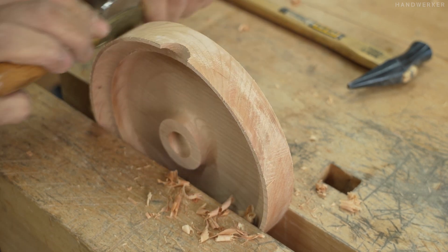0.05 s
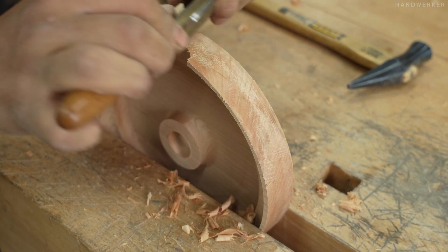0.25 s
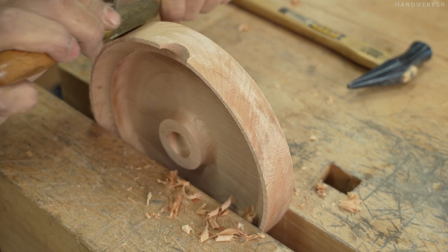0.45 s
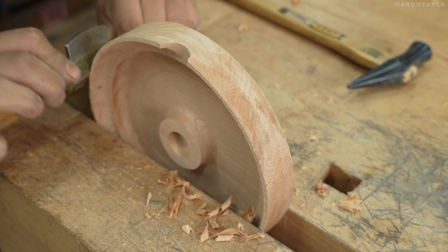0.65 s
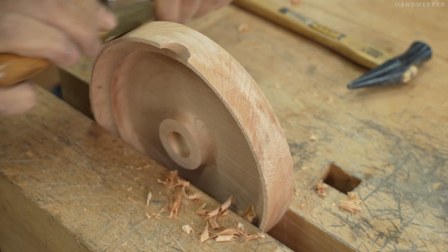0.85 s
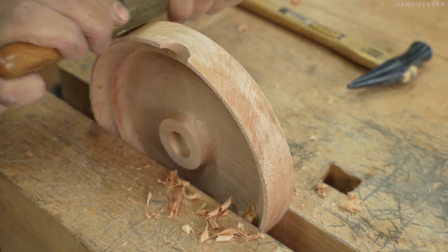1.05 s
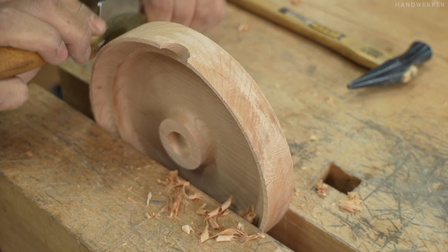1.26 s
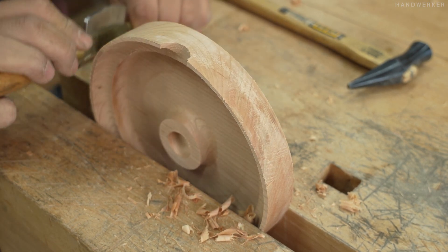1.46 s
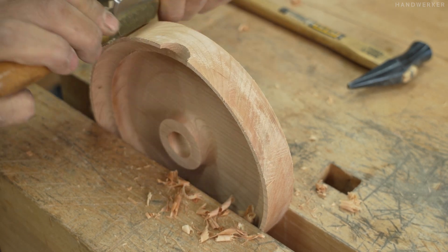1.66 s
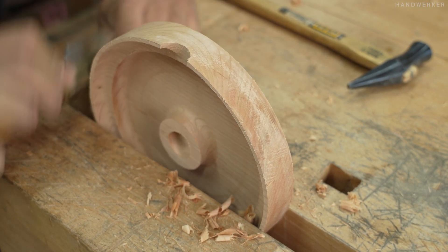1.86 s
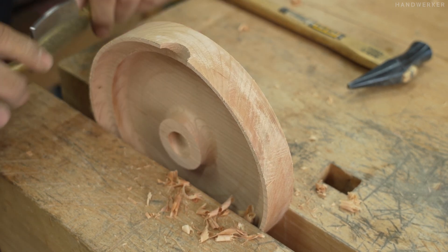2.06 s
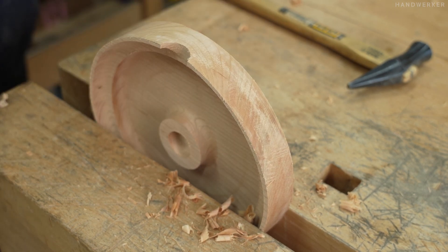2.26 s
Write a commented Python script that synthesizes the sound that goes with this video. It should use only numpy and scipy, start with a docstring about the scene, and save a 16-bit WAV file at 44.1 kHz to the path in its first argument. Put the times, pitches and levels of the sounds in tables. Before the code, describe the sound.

A steel blade shaves a wooden wheel's rim, close by in a small workshop with a faint hum. A hollow rub and brief squeak at 0.3 seconds lead into a rasping cut until 0.6. The blade taps and slides back around 0.9. Two quick cuts follow from 1.1 to 1.35, ending in a squeak. After more rubbing, a last cut comes at 1.8 with light knocks.

```python
"""In a small workshop, a two-handled steel blade shaves the rim of a wooden wheel clamped in a bench.
Four cutting strokes tear the wood fibres, which makes the steel, the shaving and the wheel ring.
Between cuts the blade is set down and slid back with a duller, hollow rub. Now and then it sticks
and slips in a short squeak. The bench rumbles under the push, and the room hums faintly."""
import sys
import numpy as np
from scipy import signal
from scipy.fft import rfft, irfft, next_fast_len
from scipy.io import wavfile
from scipy.ndimage import map_coordinates

SR = 44100
rng = np.random.default_rng(int(sys.argv[2]) if len(sys.argv) > 2 else 0)


def waveform_to_disk(signal):
    """Save audio, clipped to [-1, 1], as 16-bit WAV at the path in sys.argv[1]."""
    frames = np.transpose(np.atleast_2d(signal))
    scaled = np.clip(frames, -1, 1) * 32767
    samples = np.round(scaled).astype(np.int16)
    wavfile.write(sys.argv[1], SR, samples)


N = 105840

# The force on the blade, one list per cut. Each row: time in seconds, level in dB.
CUT_FORCES = [
    [(.335, -52.5), (.395, -32.5), (.44, -27.5), (.47, -28.5), (.51, -34.5), (.555, -31.5), (.608, -23.5),
     (.617, -40), (.69, -45), (.76, -63)],
    [(1.035, -61), (1.09, -42), (1.125, -31.5), (1.185, -27), (1.222, -33), (1.24, -49.5), (1.28, -51.5)],
    [(1.274, -48), (1.284, -36), (1.315, -27.5), (1.346, -31), (1.356, -47.5), (1.43, -44), (1.46, -60)],
    [(1.715, -58.5), (1.765, -33), (1.825, -24.5), (1.858, -28), (1.866, -43), (1.935, -45.5), (2.03, -64)],
]
# The mix of each cut. Each row: time the edge bites deep in seconds, hiss in dB, hollow ring in dB,
# shaving in dB, shaving pitch at mid-stroke in Hz, singing steel in dB, tearing in dB.
CUT_MIXES = [(.555, -2.5, -4, -6, 1128, -8.5, -4.5), (1.174, 1.5, -2, -6, 1341, -2.5, 0),
             (1.27, -0.5, -2, -10.5, 1283, -12, -4), (1.775, -2, -10, -2, 1182, -10, -4.5)]
# The blade sliding on the rim. Each row: start in seconds, length in seconds, level in dB,
# scratch compared with the wheel's ring in dB, fade over the slide in dB (below zero it grows).
SLIDES = [(0, 0.013, -25, -15, 24.5), (0.007, 0.19, -49.5, -6, 0), (0.089, 0.055, -35, -18, 12.5),
          (0.201, 0.078, -24.5, -12.5, 7), (0.493, 0.13, -25.5, -31, 10.5), (0.677, 0.017, -28, -10, 8),
          (0.825, 0.036, -37, -5, -3.5), (0.847, 0.0095, -31.5, -20, 9), (0.868, 0.047, -41, -7.5, 8),
          (0.906, 0.032, -32, -8, -1.5), (0.94, 0.059, -30, -10.5, 13), (1.402, 0.038, -27.5, -15, 5),
          (1.441, 0.0925, -47.5, -8.5, -11), (1.539, 0.058, -31.5, -10, 9.5),
          (1.608, 0.034, -31.5, -2, -0.5), (1.647, 0.066, -26, -13, 20.5), (1.915, 0.025, -27.5, -5, 6.5)]
# The blade chattering. Each row: peak time, rise and fall in seconds, pitch in Hz,
# then the levels of the first three harmonics in dB.
SQUEAK_NOTES = [(.266, 0.037, 0.011, 365, -27.5, -40, -36.5),
                (.298, 0.0069, 0.0078, 568, -16.5, -13.5, -30.5),
                (.569, 0.0061, 0.003, 602, -23.5, -30, -55), (.923, 0.0032, 0.0018, 860, -26, -44, -60),
                (1.2, 0.01, 0.019, 552.5, -26, -51, -63), (1.326, 0.027, 0.0094, 550, -28.5, -42.5, -69),
                (1.356, 0.014, 0.013, 534.4, -20.5, -39, -35.5),
                (1.567, 0.0023, 0.0032, 784, -23, -63, -65)]
# Brief touches. Each row: time in seconds, level in dB.
BLADE_TAPS = [(.2572, -40), (.8285, -16.5), (.859, -28.5), (.935, -43), (1.7815, -21.5), (1.927, -20.5)]  # the blade lands on the rim or catches in the grain
TOOL_TICKS = [(2.15, -34)]  # the tool is lifted away
# The bench shaking. Each row: peak time in seconds, width in seconds, level in dB.
BENCH_SHUDDERS = [(.48, 0.14, -45.5), (0.719, 0.03, -41), (1.809, 0.076, -44), (1.95, 0.055, -44)]

# Modes are the pitches a thing rings at. Each row: pitch in Hz, relative level in dB.
STEEL_MODES = [(2550, 3.5), (3400, 3), (4260, 4.5), (4850, 2), (5700, 2.5), (6480, 2), (7180, 0), (7900, 0),
               (9050, -0.5), (10900, -1), (11650, -5), (13400, -1), (14900, -2)]
# More modes. Each row: pitch in Hz, width in Hz (narrow rings longer), relative level in dB.
SINGING_MODES = [(4205, 200, -0.5), (6430, 480, -9.5)]  # the blade's strongest rings in a steady cut
HOLLOW_MODES = [(375, 53, -4.5), (560, 49, 3.5), (742, 116, -0.5)]  # the wheel under a cut
SLIDE_MODES = [(360, 77, -9.5), (575, 58, -6), (703, 50, -2.5), (788, 28.6, 6), (883, 94, -1),
               (1315, 123, -7), (1933, 55, -13)]  # wheel and tool under a slide
RASP_MODES = [(3163, 170, -5), (3624, 160, -3)]  # the blade scratching hard
BENCH_MODES = [(70.6, 75, -14.5), (130.4, 11.7, -0.5), (284, 11.2, -0.5)]  # the heavy bench
HUM_MODES = [(119.5, 4.2, -9.5), (234.4, 3.2, -11.5), (273.9, 5.9, -8)]  # the workshop's low hum
WHINE_MODES = [(15140, 240, -41.5)]  # a faint high whine

# Tone shapes, from bass to treble. Each row: frequency in Hz, relative level in dB.
TEARING_SHAPE = [(100, -27), (300, -26), (800, 10.5), (1500, 6.5), (2100, 0.5), (5000, -4), (16000, -20)]  # fibres tearing
HISS_SHAPE = [(3000, -31), (8500, -2.5), (11000, 3), (12400, -0.5), (13400, 11.5), (16000, -2)]  # the biting edge
SCRATCH_SHAPE = [(2000, 10), (3400, -6), (4300, 1), (8000, -5), (14000, -3.5)]  # what shakes the blade in a slide
TAP_SHAPE = [(150, -6), (800, 5), (1900, -6.5), (7000, 5), (10000, -8), (16000, -34)]  # steel landing on wood
AIR_SHAPE = [(30, -11.5), (110, 0), (700, -8.5), (2000, -15.5), (7000, -24.5), (15000, -23)]  # the air in the room
# The room's echo. Each row: frequency in Hz, seconds it takes to fade by 60 dB.
ROOM_FADE = [(200, 0.41), (12000, 0.031)]

FIBRES_PER_S, FIBRE_SPREAD_DB, FIBRE_FLUTTER_DB = 9000, 2.5, 1.5
BITE_S, HISS_RISE_S = 0.0051, 0.017  # the hiss comes up more slowly than the edge digs in
BITE_HISS_DB, BITE_HOLLOW_DB, BITE_SHAVING_DB = 12.5, 3.5, -3.5  # what the bite changes
HISS_GROWTH = 0.12  # extra dB of hiss for each dB of force
SHAVING_WIDTH_HZ, SHAVING_SAG_PER_S = 330, .9
STEEL_WIDTH_HZ, STEEL_WIDTH_SHARE = 130, .016  # a mode's width: a base plus a share of its pitch
SLIPS_PER_S, SCRATCHES_PER_S, SLIP_SPREAD_DB, SLIP_FLUTTER_DB = 3000, 1800, 1.5, 2
SLIDE_RISE_S, SLIDE_FADE_S = 0.0071, 0.0063
DAMPING_DB = -24.5  # a slide this strong doubles the width of the wheel's modes
SQUEAK_SAG_PER_S, JITTER_SHARE, JITTERS_PER_S = .45, .018, 350
OVERTONE_FALL_DB = 8.5  # each harmonic above the third is this much weaker than the one before
TOP_HZ = 15900


def cuts(blade_db=-2):
    """Tearing fibres ring blade, shaving and wheel; hiss and hollow ring grow once the edge bites."""
    out = np.zeros(N)
    for force, mix in zip(CUT_FORCES, CUT_MIXES):
        bite_s, hiss_db, hollow_db, shaving_db, shaving_hz, singing_db, tearing_db = mix
        times, force_db = np.transpose(force)
        level = amp(np.interp(clock(), times, force_db, left=-120, right=-120))
        # Both of these glide from 1 to 0 as the edge digs in.
        shallow = .5 - .5 * np.tanh((clock() - bite_s) / BITE_S)
        dull = .5 - .5 * np.tanh((clock() - bite_s) / HISS_RISE_S)
        push = (level / amp(force_db.max())) ** HISS_GROWTH
        on_steel, on_edge, on_wood, fibres = [
            snaps(FIBRES_PER_S, FIBRE_SPREAD_DB, FIBRE_FLUTTER_DB) for _ in range(4)]
        steel = amp(blade_db) * blade(on_steel)
        singing = amp(singing_db) * unit(ring(on_edge, SINGING_MODES))
        tearing = amp(tearing_db) * unit(colour(fibres, TEARING_SHAPE))
        hiss = amp(hiss_db - BITE_HISS_DB * dull) * push * unit(colour(on_edge, HISS_SHAPE))
        hollow = amp(hollow_db - BITE_HOLLOW_DB * shallow) * unit(ring(on_wood, HOLLOW_MODES))
        curl = amp(shaving_db - BITE_SHAVING_DB * shallow) * shaving(shaving_hz, times.mean())
        out += level * (steel + singing + tearing + hiss + hollow + curl)
    return out


def blade(shaking):
    """The steel rings at its own pitches when it is shaken."""
    modes = [(hz, STEEL_WIDTH_HZ + STEEL_WIDTH_SHARE * hz, db) for hz, db in STEEL_MODES]
    return unit(ring(shaking, modes))


def shaving(hz, middle_s):
    """The curling shaving rasps at a rough pitch that sinks as it grows longer."""
    pitch = hz * np.exp(-SHAVING_SAG_PER_S * (clock() - middle_s))
    phase = 2 * np.pi * np.cumsum(pitch) / SR
    return unit(wobble(SHAVING_WIDTH_HZ) * np.cos(phase) + wobble(SHAVING_WIDTH_HZ) * np.sin(phase))


def snaps(per_second, spread_db, flutter_db):
    """Fibres catch and let go: tiny random clicks of uneven size, in clumps."""
    hits = rng.random(N) < per_second / SR
    signs = rng.choice([-1, 1], N)
    sizes = amp(spread_db * rng.standard_normal(N) + flutter_db * wobble(260))
    return unit(hits * signs * sizes)


def slides(rasp_db=1):
    """The blade slips over the grain and rings mostly the wheel; firm pressure deadens that ring."""
    out = np.zeros(N)
    slips = snaps(SLIPS_PER_S, SLIP_SPREAD_DB, SLIP_FLUTTER_DB)
    catches = snaps(SCRATCHES_PER_S, FIBRE_SPREAD_DB, SLIP_FLUTTER_DB)
    scratch = blade(colour(catches, SCRATCH_SHAPE))
    rasp = amp(rasp_db) * unit(ring(rng.standard_normal(N), RASP_MODES))
    for start, length, db, scratch_db, fade_db in SLIDES:
        age = clock() - start
        damping = 1 + amp(db - DAMPING_DB) ** 2
        wheel = unit(ring(slips, [(hz, width * damping, mode_db) for hz, width, mode_db in SLIDE_MODES]))
        rise = np.clip(age / SLIDE_RISE_S, 0, 1)
        release = np.exp(-np.maximum(age - length, 0) / SLIDE_FADE_S)
        level = rise * release * amp(db - fade_db * np.clip(age / length, 0, 1))
        out += level * (wheel + amp(scratch_db) * scratch + amp(2 * scratch_db) * rasp)
    return out


def squeaks(harmonics=6, friction_db=-23):
    """The blade sticks and slips in step with the wheel's ring: a sinking note, brightest at its peak."""
    out = np.zeros(N)
    friction = amp(friction_db) * unit(colour(rng.standard_normal(N), TEARING_SHAPE))
    for peak_s, rise_s, fall_s, hz, *levels_db in SQUEAK_NOTES:
        pitch = hz * (1 - SQUEAK_SAG_PER_S * (clock() - peak_s) + JITTER_SHARE * wobble(JITTERS_PER_S))
        phase = 2 * np.pi * np.cumsum(pitch) / SR
        overtones_db = [levels_db[-1] - OVERTONE_FALL_DB * k for k in range(1, harmonics - 2)]
        grip = swell(peak_s, rise_s, fall_s)
        tone = np.sqrt(2) * sum(amp(db) * grip ** np.sqrt(k) * np.sin(k * phase)
                                for k, db in enumerate(levels_db + overtones_db, 1))
        out += tone + grip * amp(levels_db[0]) * friction
    return out


def taps(knock_db=30):
    """Steel lands on wood with a dry tap and knocks the hollow wheel."""
    blows = np.zeros(N)
    for start, db in BLADE_TAPS:
        blows[round(start * SR)] = amp(db + knock_db)
    clicks = colour(bursts(BLADE_TAPS, fade_s=0.017), TAP_SHAPE)
    return clicks + ring(blows, HOLLOW_MODES) + ring(blows, SLIDE_MODES)


def tick(hz=4820, width_hz=380, ring_db=6.4):
    """The tool gives a thin metal tick as it is lifted away."""
    return ring(bursts(TOOL_TICKS, fade_s=0.016), [(hz, width_hz, ring_db)])


def bench():
    """The heavy bench rumbles as the push comes and goes."""
    level = sum(amp(db) * swell(peak_s, width, width) for peak_s, width, db in BENCH_SHUDDERS)
    return level * unit(ring(rng.standard_normal(N), BENCH_MODES))


def room(sound):
    """The small room adds a short echo in which the treble dies first."""
    hz, t, spectrum = signal.stft(rng.standard_normal(SR // 2), SR, nperseg=256)
    fade = amp(-60 * t / along(ROOM_FADE, hz)[:, None])
    tail = signal.istft(spectrum * fade, SR, nperseg=256)[1]
    return signal.fftconvolve(sound, tail / np.linalg.norm(tail))[:N]


def workshop(hum_db=-52, air_db=-53):
    """A low wavering hum and a high whine sit over faint air noise."""
    whine = ring(rng.standard_normal(N), WHINE_MODES)
    hum = amp(hum_db) * unit(ring(rng.standard_normal(N), HUM_MODES))
    air = amp(air_db) * unit(colour(rng.standard_normal(N), AIR_SHAPE))
    return whine + hum + air


def amp(db):
    """Turn decibels into a number to multiply by."""
    return 10 ** (np.asarray(db) / 20)


def unit(x):
    """Scale a sound to an average strength (rms) of 1."""
    return x / np.sqrt(np.mean(x ** 2) + 1e-20)


def clock():
    """The time of each sample in seconds."""
    return np.arange(N) / SR


def along(points, hz):
    """Read between (Hz, value) points, with octaves evenly spaced."""
    point_hz, values = np.transpose(points)
    return np.interp(np.log(hz + 1), np.log(point_hz + 1), values)


def wobble(per_second):
    """A smooth curve through this many random values a second."""
    return map_coordinates(rng.standard_normal(N // 10), [clock() * per_second + 2], mode="wrap")


def swell(peak_s, rise_s, fall_s):
    """A bell-shaped loudness curve with its own rise and fall."""
    t = clock() - peak_s
    return np.exp(-.5 * (t / np.where(t < 0, rise_s, fall_s)) ** 2)


def bursts(rows, fade_s):
    """Sudden puffs of noise that each drop 60 dB in fade_s."""
    t = clock()
    level = sum((t >= start) * amp(db - 60 * np.abs(t - start) / fade_s) for start, db in rows)
    return level * rng.standard_normal(N)


def filtered(x, response):
    """Multiply each frequency in a sound by response(Hz)."""
    size = 2 * next_fast_len(N // 2 + SR // 2)
    return irfft(rfft(x, size) * response(np.fft.rfftfreq(size, 1 / SR)), size)[:N]


def ring(x, modes):
    """Let a sound ring a set of modes, with every second one flipped in sign."""
    def response(f):
        return sum((-1) ** k * amp(db) * 1j * f * width / (hz * hz - f * f + 1j * f * width)
                   for k, (hz, width, db) in enumerate(modes))
    return filtered(x, response)


def colour(x, shape):
    """Give a sound a tone shape."""
    def response(f):
        cepstrum = irfft(np.log(amp(along(shape, f))))
        half = len(cepstrum) // 2
        # Keeping only the first half stops the filter from sounding ahead of its input.
        cepstrum[1:half] *= 2
        cepstrum[half + 1:] = 0
        return np.exp(rfft(cepstrum))
    return filtered(x, response)


def scene(room_db=-16, squeak_room_db=-18):
    """The work at the bench, close by, in its room; the squeaks get less echo."""
    work = cuts() + slides() + taps() + tick()
    chatter = squeaks()
    echo = room(amp(room_db) * work + amp(squeak_room_db) * chatter)
    return (work + chatter + echo + bench() + workshop())[None]


def record(dry):
    """Remove all treble above TOP_HZ."""
    return filtered(dry[0], lambda hz: hz < TOP_HZ)[None]


dry = scene()
out = record(dry)
waveform_to_disk(out)
```